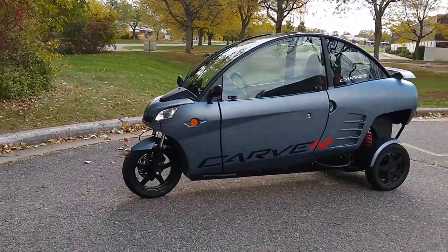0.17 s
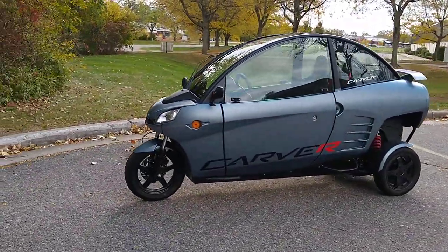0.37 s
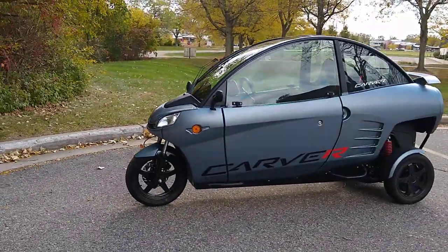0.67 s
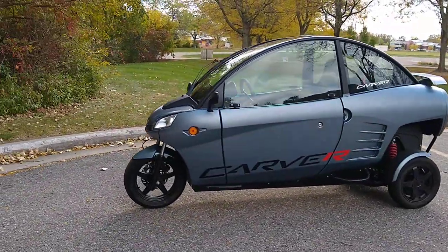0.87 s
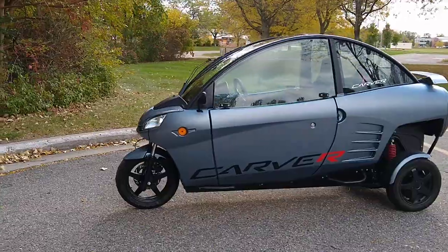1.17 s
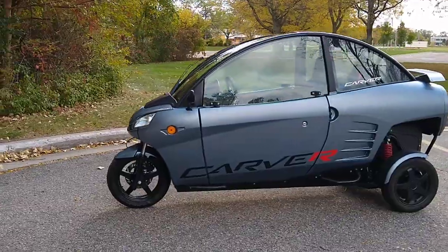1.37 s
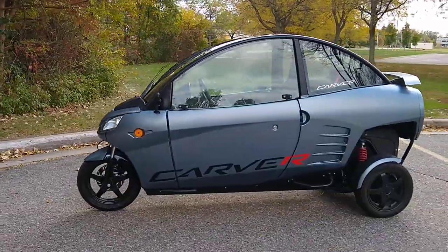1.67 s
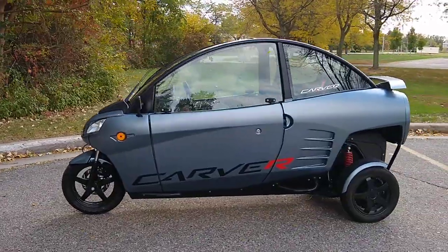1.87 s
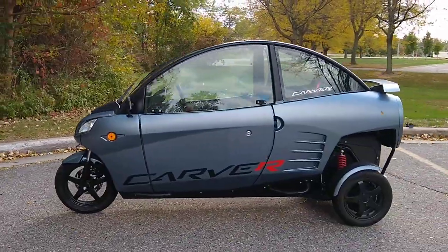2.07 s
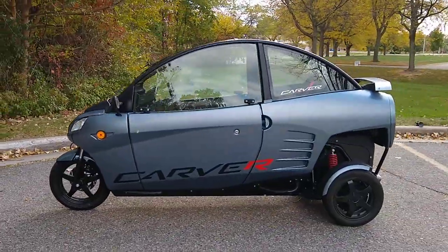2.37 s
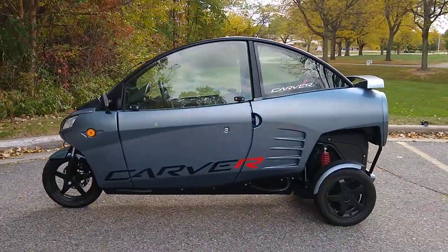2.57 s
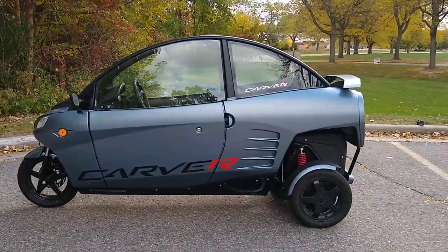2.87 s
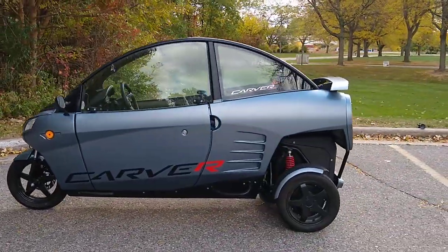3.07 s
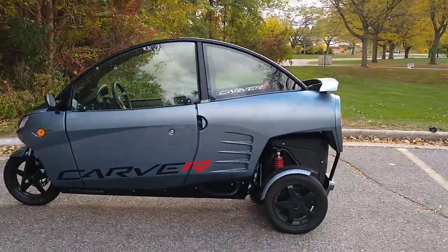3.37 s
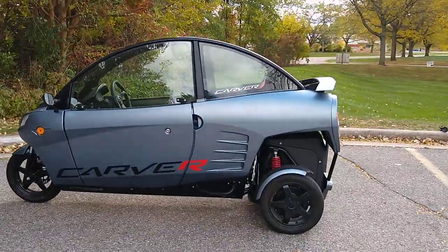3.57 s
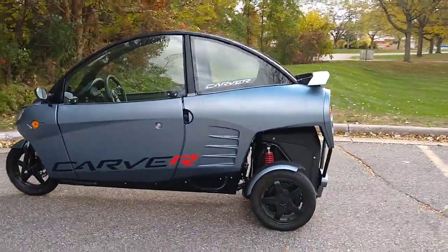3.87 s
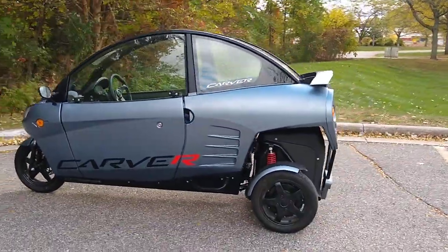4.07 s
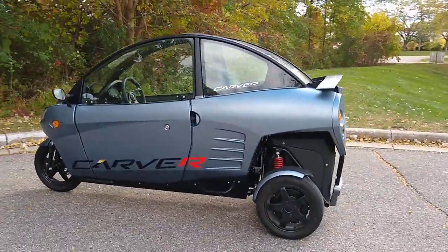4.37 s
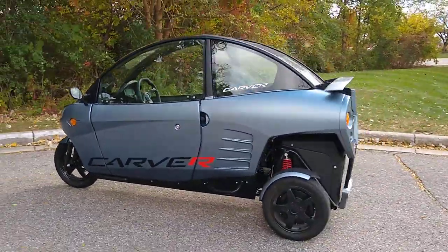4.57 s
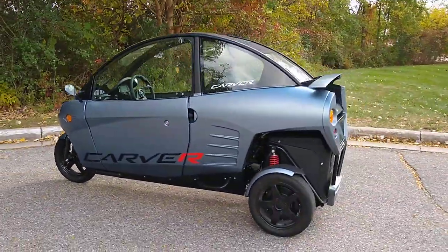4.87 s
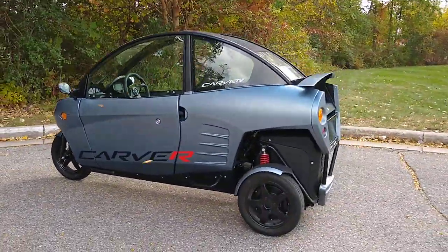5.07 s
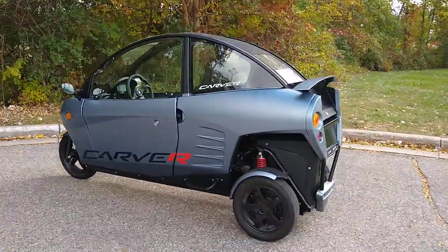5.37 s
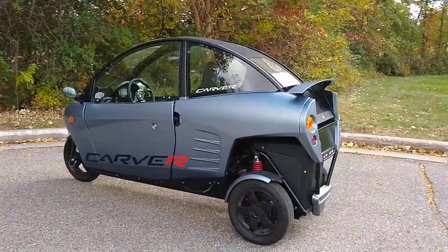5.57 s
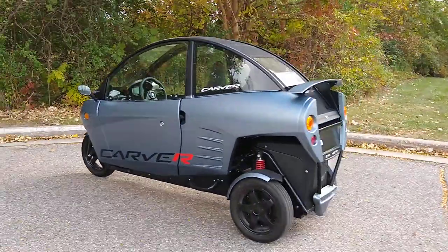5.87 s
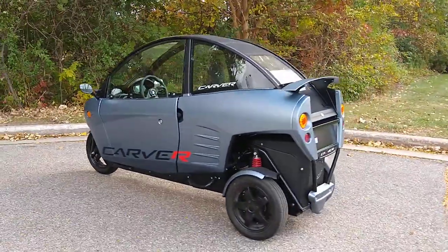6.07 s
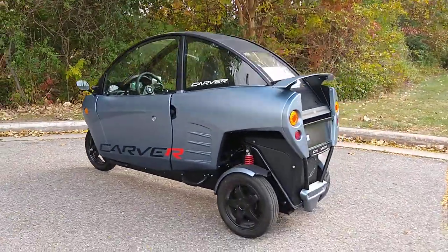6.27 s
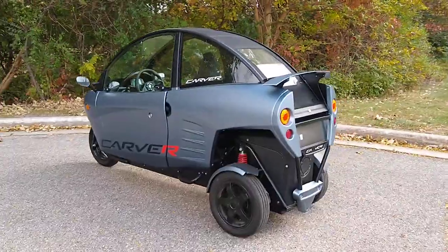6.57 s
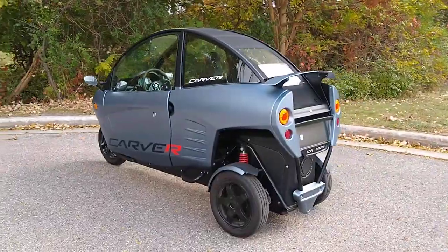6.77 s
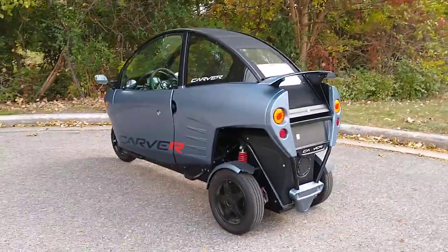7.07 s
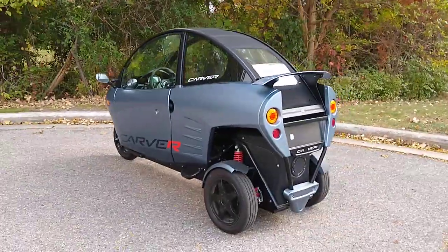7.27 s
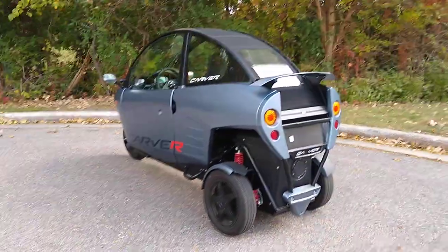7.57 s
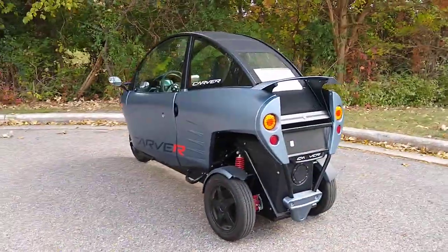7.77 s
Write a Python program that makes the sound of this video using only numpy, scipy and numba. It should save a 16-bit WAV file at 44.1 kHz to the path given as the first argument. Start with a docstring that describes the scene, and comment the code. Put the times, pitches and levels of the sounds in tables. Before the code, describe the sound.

An open parking area in wind, heard through an exposed stereo microphone. From 0 s, low, uneven flutter presses mostly on the left, with quick puffs on the right, over faint dull traffic and a soft treetop hiss. A tiny scuff comes at 0.4 s and sparse dry ticks near 0.8-1.0 s. At 2.1 s a thin, high insect-like rasp starts suddenly, holds, and fades by 3 s. Nearby bushes start rustling around 3.5 s; dull shoe knocks fall at 3.65 and 4.6 s. Gusts thicken, and from 5.5 to 7 s become a rushing roar, heavily left, with short hard slaps and briefly ducked background. Leaves click sharply at 5.75 s; grit grinds under a shoe at 6.1-6.25 s. From 6.8 s leaves skitter busily, with bright ticks around 7.3 and 7.6 s, as the wind eases until the end at about 7.9 s.

```python
"""Gusts buffet the two ports of a microphone: low flutter, then a rushing roar, mostly left, that eases off.
Wind is low-passed noise whose corner and level follow air speed; single eddies add short slaps.
Dry leaves tick, bounce and skitter on asphalt (noise bursts through resonances); an insect buzzes briefly,
shoes scuff, grind grit and knock (shaped noise). Far traffic is even; treetops and bushes swell as time
goes on; all are banded, flickering noise. Loud gusts turn the common gain down."""
import sys
import numpy as np
from scipy import signal
from scipy.io import wavfile
from numba import njit

SR = 44100
rng = np.random.default_rng(int(sys.argv[2]) if len(sys.argv) > 2 else 0)


def wrap_up_sound(samples):
    """Save the sound to the file named by the first command line argument, as 16-bit audio."""
    columns = np.atleast_2d(samples).T
    # keep every value between -1 and 1, then stretch to whole-number steps
    tamed = np.clip(columns, -1, 1)
    steps = np.round(tamed * 32767).astype(np.int16)
    wavfile.write(sys.argv[1], SR, steps)


N = 348831
TIME = np.arange(N) / SR
TINY = 1e-18   # keeps filters out of denormals


def from_db(db):
    """Decibels to amplitude gain."""
    return 10 ** (np.asarray(db) / 20)


def rms_one(x):
    """Scale to unit power."""
    return x / np.sqrt(np.mean(x ** 2) + 1e-20)


def in_time(rows):
    """Interpolate each column of a t/s table at every sample."""
    s, *columns = np.transpose(rows)
    return [np.interp(TIME, s, c) for c in columns]


def at_hz(points, hz):
    """Read a spectrum on a log-frequency axis."""
    point_hz, point_db = np.array(points).T
    return np.interp(np.log(hz), np.log(point_hz), point_db)


def panned(lean_db):
    """Left and right gains for a left-minus-right level difference."""
    return from_db(np.array([[.5], [-.5]]) * lean_db)


def drift(rate_hz):
    """Smooth random curve of unit rms, changing at about the given rate."""
    hop, settle = 20, 4000   # made at SR / hop, start-up dropped
    r = np.exp(-2 * np.pi * rate_hz * hop / SR)
    white = rng.standard_normal(N // hop + settle + 2)
    slow = signal.lfilter([1], [1, -2 * r, r * r], white)[settle:]
    return np.interp(np.arange(N) / hop, np.arange(len(slow)), rms_one(slow))


def high_pass(x, hz, order):
    """Butterworth low cut."""
    return signal.sosfilt(signal.butter(order, hz, "high", fs=SR, output="sos"), x)


def resonance(x, hz, width_hz):
    """Two-pole band-pass with gain near 1 at its centre."""
    r = np.exp(-np.pi * width_hz / SR)
    numerator = np.array([1, 0, -1]) * (1 - r * r) / 2
    denominator = [1, -2 * r * np.cos(2 * np.pi * hz / SR), r * r]
    return signal.lfilter(numerator, denominator, x + TINY)


def double_resonance(x, hz, width_hz):
    """Two equal resonances in series: steeper skirts."""
    return resonance(resonance(x, hz, width_hz), hz, width_hz)


def diffuse_noise(spectrum, lean, flicker_db, flicker_hz, alike_below_hz):
    """Quarter-octave stereo noise bands that flicker separately; long waves reach both sides alike."""
    out, edges_hz = 0, 125 * 2 ** (np.arange(29) / 4)
    white = rng.standard_normal((2, 2, N))
    for k, (low, high) in enumerate(zip(edges_hz, edges_hz[1:])):
        band = signal.butter(2, [low, high], "band", fs=SR, output="sos")
        mid, side = signal.sosfilt(band, white[k % 2])
        hz = np.sqrt(low * high)
        alike = np.sinc(hz / (2 * alike_below_hz)) * np.exp(-hz / (10 * alike_below_hz))
        level = from_db(at_hz(spectrum, hz) + flicker_db * drift(flicker_hz))
        gain = level * panned(at_hz(lean, hz) if lean else 0)
        out = out + gain * (np.sqrt(1 + alike) * mid + np.sqrt(1 - alike) * side * [[1], [-1]])
    return rms_one(out)


# road-noise band weights: f/Hz, level/dB
TRAFFIC_SPECTRUM = [(150, -27), (300, -2), (480, -2.5), (850, 1.5), (1250, -6), (1800, -10), (3000, -30),
                    (6000, -26)]
TRAFFIC_RMS_DB = -45.5


def far_traffic():
    """Tyres on distant roads: a dull, even wash."""
    wash = diffuse_noise(TRAFFIC_SPECTRUM, None, flicker_db=1.06, flicker_hz=5.1, alike_below_hz=440)
    return from_db(TRAFFIC_RMS_DB) * wash


# treetop rustle: t/s, level/dB
TREETOP_LEVELS = [(0, -44.5), (3.9, -43.5), (5.3, -41.5), (6.17, -39), (6.55, -41.5), (7.05, -40),
                  (7.91, -40.5)]
# rustle band weights: f/Hz, level/dB
RUSTLE_SPECTRUM = [(900, 0), (1800, 3), (2800, 3.5), (4400, 1.5), (6500, -2), (8500, -0.9), (10200, -3),
                   (11800, -11.5), (13500, -14), (16000, -18)]
# rustle balance by band: f/Hz, left minus right/dB
RUSTLE_BALANCE = [(1500, -5), (4500, -1.5), (8000, -3), (11000, -13), (15000, -8)]
TREES_LEAN_DB = 4   # added to the balance by band


def treetops():
    """Countless far leaves brush together and blur into a swelling hiss."""
    rustle_db, = in_time(TREETOP_LEVELS)
    hiss = diffuse_noise(RUSTLE_SPECTRUM, RUSTLE_BALANCE, flicker_db=1.0, flicker_hz=27.0, alike_below_hz=700)
    return hiss * from_db(rustle_db) * panned(TREES_LEAN_DB)


# rustle of bushes by the kerb: t/s, level/dB
BUSH_LEVELS = [(0, -70), (3.3, -64), (3.8, -50.5), (5.4, -51.5), (6.0, -52.5), (7.1, -49.5), (7.91, -56)]


def bushes(hz=4400, width_hz=2000, flutter_db=-0.5):
    """Small, stiff leaves close by flutter in a single band narrower than the treetop hiss."""
    rustle_db, = in_time(BUSH_LEVELS)
    hiss = rms_one(double_resonance(rng.standard_normal((2, N)), hz, width_hz))
    return hiss * from_db(rustle_db + flutter_db * drift(25)) * panned(2.5)


# shoe scuffs: t/s, level at the swell's top/dB, half length/s, centre f/Hz, width/Hz
SHOE_SCUFFS = [(0.356, -49, 0.036, 5000, 3500), (6.128, -44, 0.039, 4500, 6000),
               (6.235, -42.5, 0.016, 4500, 7000)]


def scuffs(gritty_db=4.5):
    """A sole slides over grit: a short swell of rough friction noise."""
    out = np.zeros((2, N))
    grit = rng.standard_normal((2, N)) * from_db(gritty_db * drift(140))
    for s, level_db, half_s, hz, width_hz in SHOE_SCUFFS:
        swell = np.exp(-np.minimum(((TIME - s) / half_s) ** 2, 100) / 2)
        out += rms_one(resonance(grit, hz, width_hz)) * from_db(level_db) * swell
    return out


# heel and sole contacts: t/s, peak level/dB, centre f/Hz
SHOE_CONTACTS = [(3.638, -35, 1200), (3.651, -30, 950), (3.659, -33, 2000), (4.578, -28.5, 950)]


def footfalls(decay_s=0.003, width_hz=750):
    """A soft sole meets the asphalt with a brief, dull knock."""
    out, t = np.zeros((2, N)), TIME[:SR // 20]
    for s, peak_db, hz in SHOE_CONTACTS:
        contact = rng.standard_normal((2, len(t))) * np.exp(-t / decay_s)
        knock = double_resonance(contact, hz, width_hz)
        start = int(s * SR)
        out[:, start:start + len(t)] += knock / np.abs(knock).max() * from_db(peak_db)
    return out


# buzz resonances: f/Hz, width/Hz, level before panning/dB
BUZZ_RESONANCES = [(8500, 1200, -55), (8500, 4500, -53), (14050, 1400, -61.5)]
BUZZ_START_S, BUZZ_ATTACK_S, BUZZ_HOLD_S, BUZZ_RELEASE_S = 2.11, 0.036, 0.35, 0.5


def insect(rasp_db=-0.5, lean_db=5.0):
    """Probably an insect: a thin rasp in high resonances starts suddenly, holds and fades."""
    age_s = TIME - BUZZ_START_S
    attack = np.clip(age_s / BUZZ_ATTACK_S, 0, 1)
    release = np.clip(1 - (age_s - BUZZ_ATTACK_S - BUZZ_HOLD_S) / BUZZ_RELEASE_S, 0, 1)
    rasp = rng.standard_normal((2, N)) * from_db(rasp_db * drift(60))
    buzz = np.zeros((2, N))
    for hz, width_hz, level_db in BUZZ_RESONANCES:
        buzz += from_db(level_db) * rms_one(double_resonance(rasp, hz, width_hz))
    return buzz * attack * release * panned(lean_db)


# leaves sliding on the ground: t/s, nominal scrape rate/(1/s), base size level/dB
SKITTER_ACTIVITY = [(0, 20, -55), (4.7, 25, -51.5), (5.1, 120, -53), (5.5, 50, -60), (6.13, 210, -51),
                    (6.45, 110, -55), (6.8, 310, -42), (7.05, 320, -48), (7.55, 320, -45), (7.9, 180, -45)]


def skitter(scrape_s=0.0014, tilt_db=-1):
    """Leaf edges drag over asphalt in flurries of tiny decaying scrapes, each with one of 12 rings."""
    per_s, size_db = in_time(SKITTER_ACTIVITY)
    born = rng.random(N) < per_s * from_db(4 * drift(14)) / SR
    scrapes = born * from_db(size_db + 2 * np.minimum(rng.exponential(1, N), 3))
    count = 12
    leaf, out = rng.integers(0, count, N), np.zeros((2, N))
    friction = rng.standard_normal((2, N))
    decay = np.exp(-1 / (scrape_s * SR))
    for k, hz in enumerate(np.linspace(4000, 13500, count)):
        envelope = signal.lfilter([1], [1, -decay], scrapes * (leaf == k) + TINY)
        out += resonance(friction * envelope, hz, width_hz=3400) * from_db(4 + tilt_db * k / count)
    return high_pass(out, 1900, order=2) * panned(-8.0)


FINE_TICKS_PER_S, FINE_TICK_DB = 110, 12   # nominal rate at the busiest skitter; size above a scrape's


def fine_ticks(ring_width_hz=4200, spread_db=2.0, lean_db=-7, flurry_db=5, tick_s=0.00045):
    """Hard leaf tips flick the ground: flurries of very short, bright ticks that grow with the skitter."""
    per_s, size_db = in_time(SKITTER_ACTIVITY)
    busy = (per_s / per_s.max()) ** 2
    born = rng.random(N) < FINE_TICKS_PER_S * busy * from_db(flurry_db * drift(10)) / SR
    flicks = born * from_db(size_db + FINE_TICK_DB + spread_db * np.minimum(rng.exponential(1, N), 3))
    count = 6
    leaf, out = rng.integers(0, count, N), np.zeros((2, N))
    decay = np.exp(-1 / (tick_s * SR))
    for k, hz in enumerate(np.linspace(9000, 13800, count)):
        snap = signal.lfilter([1], [1, -decay], flicks * (leaf == k) + TINY)
        out += double_resonance(snap * rng.standard_normal((2, N)), hz, ring_width_hz)
    return out * panned(lean_db)


# short dry ticks: leaves landing and bouncing, and grit under a shoe near 6.1-6.25 s:
# t/s, relative level/dB, ring f/Hz, side (left > 0) and gain/dB, crackle decay/s
DRY_TICKS = [(0.835,-24,8600,0,.004), (0.999,-28,7200,2,.003), (5.059,-27,9600,-10,.007),
             (5.115,-30,9770,-9,.009), (5.713,-25,13200,-10,.003), (5.738,-12.5,9700,9,0.0016),
             (5.744,-20,10000,6,0.0013), (5.748,-24,9500,4,.001), (5.755,-20,11500,-4,.001),
             (5.775,-15,11500,-7,.0022), (5.775,-12,4760,0,0.0029), (5.782,-25,11500,-4,.0015),
             (5.992,-30,12500,-8,.001), (6.043,-27,10000,-6,.002), (6.082,-27,12000,-8,.001),
             (6.091,-27,12500,-8,.001), (6.111,-24,10800,-12,.003), (6.122,-23,3570,-6,.003),
             (6.130,-26,8500,-6,.0015), (6.139,-22,5600,-6,.002), (6.151,-22,3400,-6,.004),
             (6.158,-26,9000,-6,.001), (6.164,-17.5,3500,0.5,0.0056), (6.234,-22,4380,-4,.002),
             (6.238,-29,10000,-6,.001), (6.366,-26,10500,-15,.002), (6.42,-26,7200,-3,.0015),
             (6.525,-29,11500,-10,.001), (6.553,-27,11000,-10,.001), (6.634,-24,10300,-9,.0012),
             (6.658,-25,10800,-11,.002), (6.675,-20,8800,-3,.0025), (6.686,-27,10500,-8,.001),
             (6.798,-28,11500,-10,.001), (6.82,-24,11500,-13,.002), (6.832,-22.5,12000,-14,.003),
             (6.906,-24,9500,-6,.001), (6.998,-23,9700,-13,0.0022), (7.042,-28,11500,-10,.001),
             (7.123,-22.5,11500,-20,0.0017), (7.226,-22.5,10800,-8.5,0.0012), (7.264,-25,8000,-4,.001),
             (7.294,-26,11500,-8,.001), (7.311,-14,9800,-5,.002), (7.314,-10,6900,0.5,.0025),
             (7.321,-20,8200,-2,.0015), (7.442,-20.5,8500,0.5,.0035), (7.461,-27,9500,-6,.001),
             (7.529,-25,12200,-8,.002), (7.544,-27,12500,-8,.001), (7.558,-24,11500,-10,.0012),
             (7.566,-12,10500,-11,0.0011), (7.601,-23,12100,-11,0.0011), (7.657,-27,10000,-2,.0012),
             (7.751,-27,11100,-8,.001), (7.762,-18,6200,-3,0.0012), (7.783,-22,10800,-12.5,.0015),
             (7.884,-29,11500,-8,.001)]


def dry_ticks(attack_s=0.00052, ring_width_hz=3200, snap_db=-14, gain_db=-4.5):
    """Leaf or grit hits asphalt: brief crackle coloured by a ring; off-centre ticks reach one port only."""
    out, t = np.zeros((2, N)), TIME[:SR // 20]
    for s, level_db, hz, lean_db, crackle_s in DRY_TICKS:
        crackle = rng.standard_normal(len(t)) * (1 - np.exp(-t / attack_s)) * np.exp(-t / crackle_s)
        width_hz = ring_width_hz * (hz / 8000) ** 1.6   # lower rings are purer
        ring = double_resonance(crackle, hz, width_hz)
        tick = high_pass(ring + from_db(snap_db) * crackle, hz / 2, order=2)
        reached = np.array([[lean_db >= 0], [lean_db <= 0]])   # left, right
        tick = tick / np.abs(tick).max() * from_db(level_db + gain_db) * panned(lean_db) * reached
        start = int(s * SR)
        out[:, start:start + len(t)] += tick[:, :N - start]
    return out


# slow wind: t/s, left air speed level/dB, right air speed level/dB
SLOW_WIND = [(0,-3,-17.5), (0.19,-10,-14), (1.14,-7.5,-16.5), (1.96,-10,-12.5), (2.75,-2.5,-13),
             (2.97,-5.5,-15), (3.77,-5,-12.5), (3.83,0,-11.5), (4.63,-0.5,-13.5), (4.72,3.5,-15.5),
             (5.497,9,-4), (5.508,13.5,-11), (6.12,11,-5.5), (6.28,11,-15), (6.8,14,-2.5), (6.96,12.5,-2),
             (7.15,7.5,-11), (7.9,5,-19)]
# gusts (rise > 0) and lulls (rise < 0): peak t/s, length/s, left rise/dB, right rise/dB
GUST_RISES = [(0.275,0.1,-2,7), (0.816,0.12,5.5,11.5), (1.485,0.18,4.5,1), (2.107,0.075,-2,-6),
              (2.238,0.16,6.5,1.5), (2.343,0.073,2,7), (2.444,.08,0,2.5), (2.553,0.028,-2,9),
              (2.617,0.042,1.5,-6), (2.708,0.056,2,-2), (2.806,0.09,2,2.5), (2.937,0.051,-4,-2),
              (3.164,0.29,2,5.5), (3.253,0.092,0.5,-1.5), (3.407,0.027,-2,7), (3.499,0.08,-4,10.5),
              (3.638,0.049,3.5,-4), (3.783,0.14,-5,-2), (3.835,0.047,-2.5,7.5), (3.953,0.08,0,7),
              (3.985,.03,0.5,0), (4.034,0.051,1.5,3.5), (4.08,0.043,-1,3), (4.134,0.06,1.5,-2),
              (4.257,0.26,3,-3), (4.331,0.045,-5,9.5), (4.48,0.062,-2.5,-2), (4.597,0.046,-1.5,5),
              (4.68,0.19,1.5,4), (4.889,0.061,1,14), (4.953,0.06,0,7.5), (5.007,0.023,1.5,2),
              (5.071,0.061,-2,7), (5.127,0.057,0.5,7.5), (5.215,0.12,1.5,-0.5), (5.356,0.12,-3.5,-1),
              (5.467,0.045,0,-1), (5.503,0.03,1.5,-7), (5.582,0.032,-2,5.5), (5.616,0.046,0.5,-2),
              (5.693,0.055,1.5,1), (5.727,0.031,0.5,-3), (5.765,0.014,-0.5,1), (5.828,0.095,3,-2),
              (5.938,0.014,-1.5,-1), (6.064,.05,0,1), (6.19,.045,1,6), (6.234,0.059,2,1),
              (6.31,0.032,-1.5,2), (6.356,0.043,1.5,-2), (6.385,0.035,-6.5,8), (6.437,0.059,-1,7.5),
              (6.489,0.1,3,2), (6.541,0.025,-2.5,-1), (6.616,0.059,2.5,0), (6.672,0.08,2.5,4),
              (6.732,0.073,0.7,4.5), (6.809,0.025,-4,-3), (6.85,0.038,2,-2.5), (6.9,.06,-0.5,2.5),
              (7.05,.02,-2.5,3), (7.145,0.045,-0.5,3), (7.235,0.026,0,6), (7.256,0.025,-9,2),
              (7.298,0.036,2,8), (7.372,0.1,4.5,2), (7.4,0.028,-2.5,-3), (7.508,0.065,3,8),
              (7.88,0.041,-2.5,5)]
GUST_RISE_SHARE = 0.45   # part of the length before the peak
TURBULENCE_DB, TURBULENCE_HZ = 0.1, 21   # random swings of air speed


def air_speed():
    """Relative speed at each port: slow wind, gusts that rise faster than they fall, turbulence."""
    turbulence = np.array([drift(TURBULENCE_HZ), drift(TURBULENCE_HZ)])
    speed_db = np.array(in_time(SLOW_WIND)) + TURBULENCE_DB * turbulence
    for s, length_s, left_db, right_db in GUST_RISES:
        share = np.where(TIME < s, GUST_RISE_SHARE, 1 - GUST_RISE_SHARE)
        phase = (TIME - s) / (length_s * share)
        speed_db = speed_db + np.outer([left_db, right_db], np.exp(-np.minimum(phase ** 2, 20)))
    return from_db(speed_db)


@njit
def moving_band(x, top_step, bottom_step):
    """Four one-pole low-passes sharing a moving corner, then a gentle moving low cut."""
    out, state, slow = np.zeros(len(x)), np.zeros(4), 0.0
    for i in range(len(x)):
        value = x[i]
        for k in range(4):
            state[k] += top_step[i] * (value - state[k])
            value = state[k]
        slow += bottom_step[i] * (value - slow)
        out[i] = value - slow
    return out


def buffeting(strength, corner_hz, lumpy_db, swirl_db, bottom_share, hollow_hz, hollow_db, low_cut_hz):
    """Eddies sweep over one port; their size sets where the pressure spectrum rolls off."""
    # turbulence packets: level and corner swing separately
    pressure = rms_one(rng.standard_normal(N) * from_db(lumpy_db * drift(57)))
    corner_hz = np.clip(corner_hz * from_db(swirl_db * drift(124)), 50, 4000)
    step = 1 - np.exp(-2 * np.pi * corner_hz / SR)
    pressure = moving_band(pressure, step, step * bottom_share) * strength
    # flow round the housing favours one hollow-sounding band
    pressure = pressure + from_db(hollow_db) * resonance(pressure, hollow_hz, width_hz=152)
    return high_pass(pressure, low_cut_hz, order=5)


# hard eddies hitting a port: t/s, relative level/dB, left minus right/dB, half width/s
PORT_SLAPS = [(4.096,-19,-14,0.00066), (4.331,-18.5,-19,0.00059), (4.879,-30,1,0.00078),
              (5.009,-11,12,0.00066), (5.192,-10,7,0.00074), (5.502,-10,21,0.0005), (5.515,-6,22,0.00028),
              (5.536,-3,23,.0004), (5.556,-5,20,0.00077), (5.72,-3,19,0.00039), (5.811,-7,24,0.00052),
              (5.823,-3,22,0.00031), (5.854,-10,16,0.00033), (5.959,-6.5,22,0.00037), (6.33,-11,24,0.0004),
              (6.471,-8,11,0.00052), (6.504,-3,18,0.00043), (6.612,-6,21,0.00018), (6.625,-5,11,0.00048),
              (6.667,-8,16,0.0003), (6.821,-20,13.5,.0004), (6.843,-25,14,0.00054), (7.064,-19,13.5,.0005),
              (7.288,-6.5,14,0.00084), (7.311,-1,24,0.00069)]


def eddy_slaps(gain_db=5.0):
    """A tight vortex crosses the port: one short, rounded suction pulse, sharper for a smaller vortex."""
    out, t = np.zeros((2, N)), TIME[:SR // 50] - 1 / 100
    for s, level_db, lean_db, half_width_s in PORT_SLAPS:
        pulse = np.hanning(len(t)) / (1 + (t / half_width_s) ** 2)
        start, sides = int(s * SR) - len(t) // 2, panned(lean_db)
        out[:, start:start + len(t)] -= from_db(level_db + gain_db) * pulse * sides / sides.mean()
    return high_pass(out + TINY, 253, order=2)


# eddy corner in still air, and its rise per unit of air speed
LEFT_CALM_HZ, LEFT_EDDY_HZ = 110, 150.7
RIGHT_CALM_HZ, RIGHT_EDDY_HZ = 84, 296
WAKE_HZ = 148   # right corner's rise per unit of left strength
CEILING_DB = 9.5   # limit that strength approaches


def port_wind():
    """Faster air: smaller, brighter eddies, levelling strength; the left's wake brightens the right."""
    speed = air_speed()
    strength = speed / np.hypot(1, speed / from_db(CEILING_DB))
    left_hz = LEFT_CALM_HZ + LEFT_EDDY_HZ * speed[0]
    right_hz = RIGHT_CALM_HZ + RIGHT_EDDY_HZ * speed[1] + WAKE_HZ * strength[0]
    left = buffeting(strength[0], left_hz, lumpy_db=1.77, swirl_db=0.52, bottom_share=0.11,
                     hollow_hz=241, hollow_db=-14.5, low_cut_hz=57.5)
    right = buffeting(strength[1], right_hz, lumpy_db=2.0, swirl_db=0.5, bottom_share=0.0076,
                      hollow_hz=152, hollow_db=-2.0, low_cut_hz=58.6)
    return np.array([left, right]) + eddy_slaps()


def scene():
    """Roads, plants, shoes, an insect, ground leaves and grit, under the wind on the microphone."""
    background = far_traffic() + treetops() + bushes()
    nearby = scuffs() + footfalls() + insect()
    ground = skitter() + fine_ticks() + dry_ticks()
    return background + nearby + ground + port_wind()


GAIN_CONTROL_DB, GAIN_CONTROL_S = -11, 0.014   # summed level where gain turns down; reaction time
CUTOFF_HZ = 15780


def gain_control(x):
    """One gain for both channels follows their summed power: hard gusts duck the leaves."""
    keep = np.exp(-1 / (GAIN_CONTROL_S * SR))
    power = signal.lfilter([1 - keep], [1, -keep], np.sum(x ** 2, axis=0))
    return x / np.sqrt(np.hypot(1, power / from_db(GAIN_CONTROL_DB) ** 2))


def record(dry):
    """Loud gusts turn the gain down, the strongest peaks are rounded and the top is cut."""
    rounded = 1.475 * np.tanh(gain_control(dry) / 1.66)
    top_cut = signal.ellip(12, .1, 80, CUTOFF_HZ, fs=SR, output="sos")
    return signal.sosfilt(top_cut, rounded)


dry = scene()
out = record(dry)
wrap_up_sound(out)
```